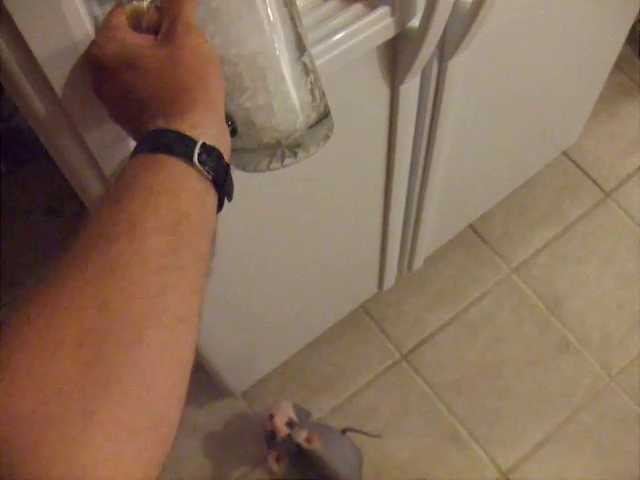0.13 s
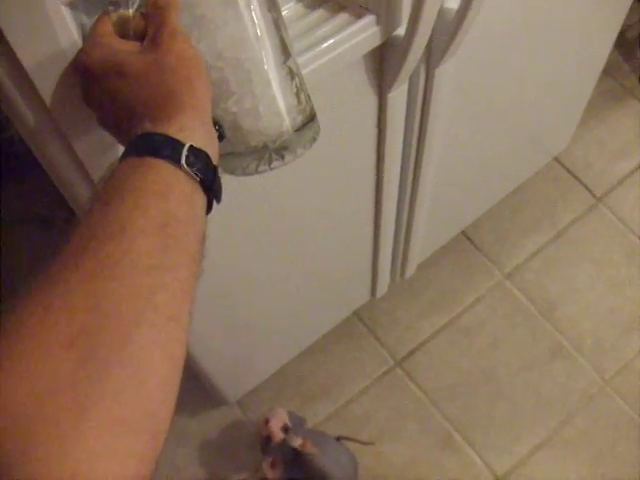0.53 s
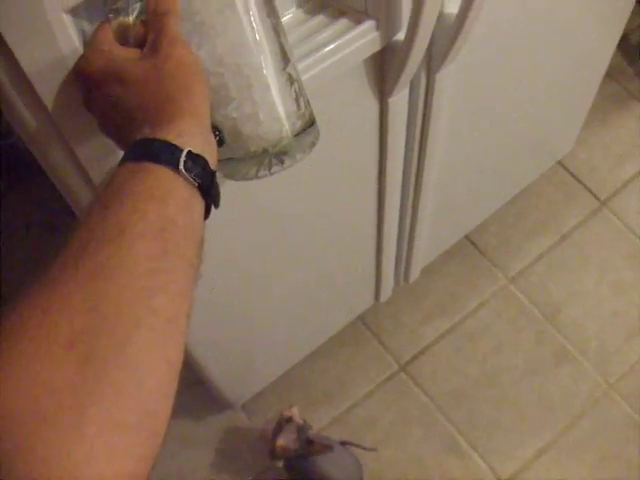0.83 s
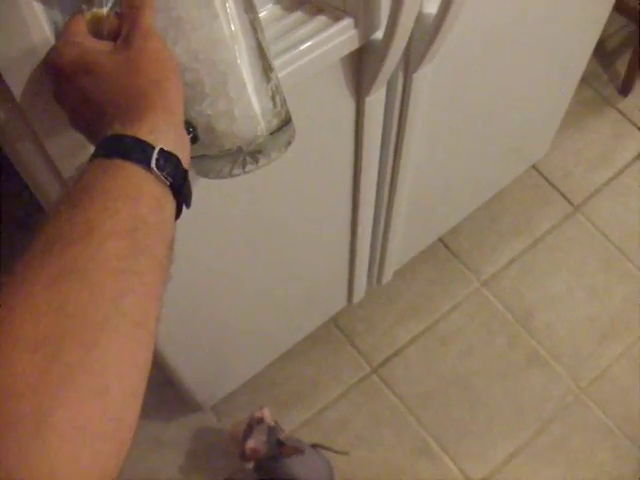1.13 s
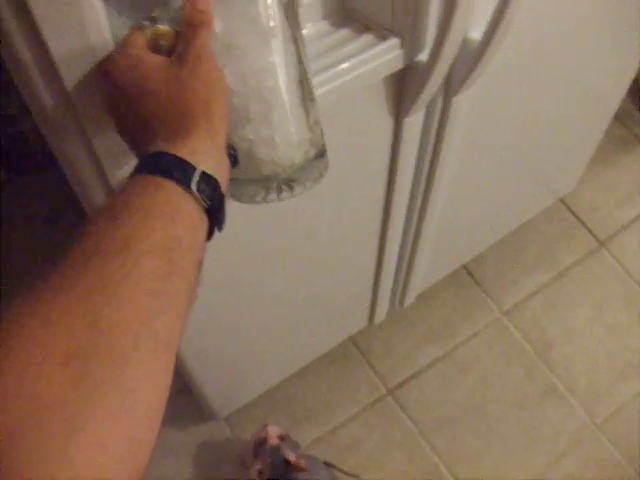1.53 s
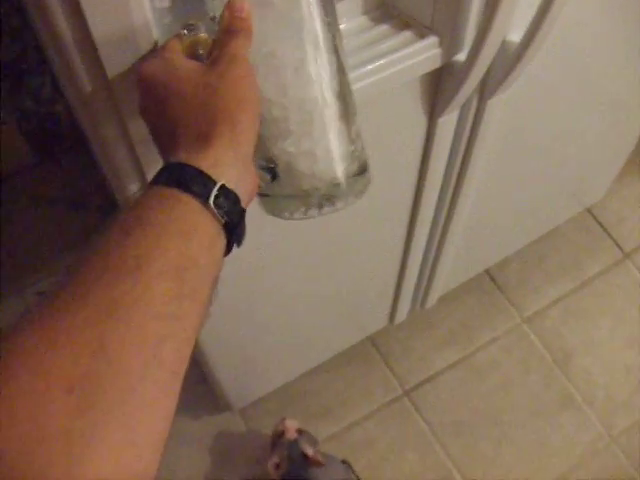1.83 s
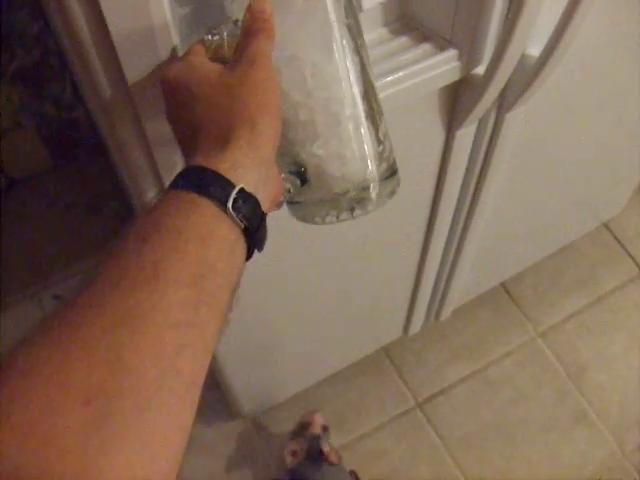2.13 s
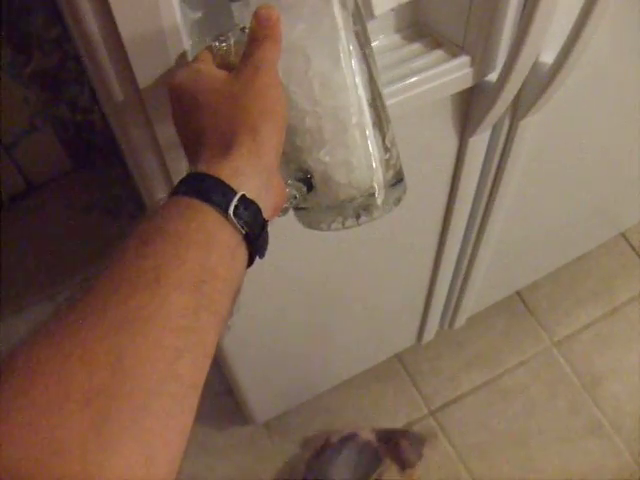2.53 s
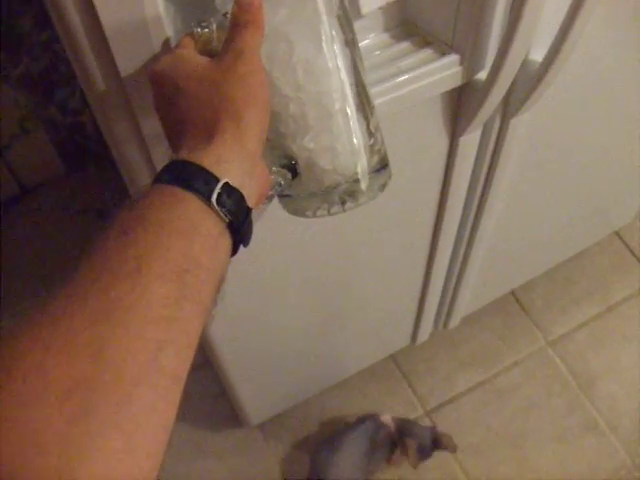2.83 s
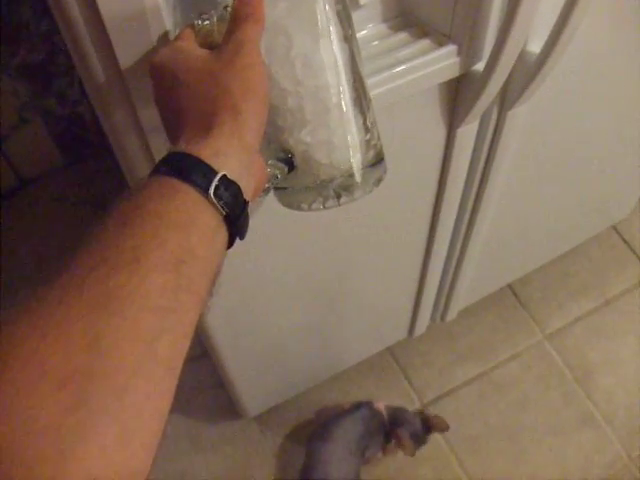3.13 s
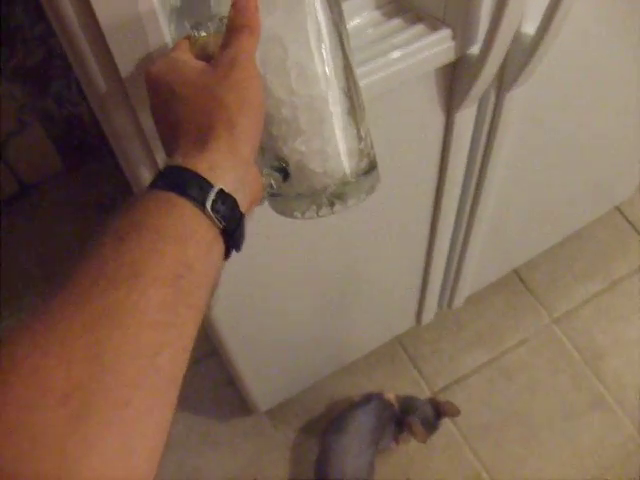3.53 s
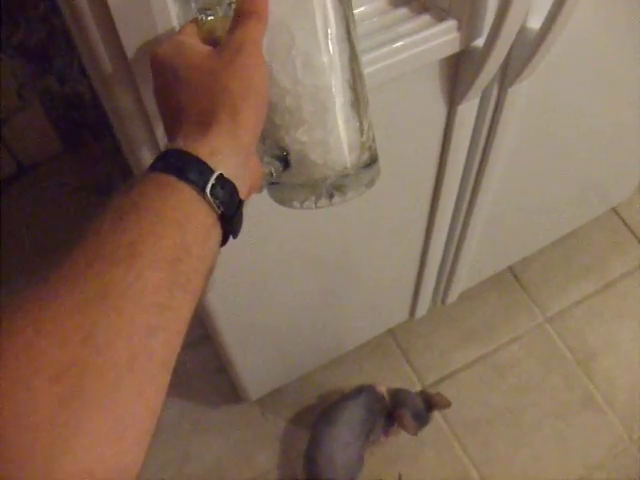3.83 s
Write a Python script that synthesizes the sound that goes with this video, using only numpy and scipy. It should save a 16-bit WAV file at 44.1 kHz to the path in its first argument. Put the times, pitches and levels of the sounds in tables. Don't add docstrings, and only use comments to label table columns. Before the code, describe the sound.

A fridge door ice crusher runs from the start, its geared motor whining unsteadily and rattling in plastic. Blades crunch hardest around 0.2-0.6 s, with more sharp cracks near 1.45-2.0 s, while chips clatter and ring into a glass mug. It stops about 2.1 s with a last clatter. Quiet room hum, ice ticks near 2.4-2.6 s, a faint flap creak 3.1-3.7 s, and final ice clicks from 3.8 s. Grainy small-camera sound.

```python
import sys
import numpy as np
from scipy import signal
from scipy.fft import rfft, irfft, next_fast_len
from scipy.io import wavfile
from scipy.ndimage import uniform_filter1d, map_coordinates

SR = 44100
rng = np.random.default_rng(int(sys.argv[2]) if len(sys.argv) > 2 else 0)


def file_out(sig):
    cols = np.atleast_2d(sig).T
    lim = np.clip(cols, -1, 1)
    pcm = np.round(lim * 32767).astype(np.int16)
    wavfile.write(sys.argv[1], SR, pcm)


def linear_from_db(decibels):
    return 10 ** (np.asarray(decibels, float) / 20)


N = 176400


def unit(x):
    return x / np.sqrt(np.mean(x ** 2) + 1e-20)


def along(points, hz):
    f, v = np.transpose(points)
    return np.interp(np.log(hz + 1), np.log(f + 1), v)


def curves(rows):
    s, *cols = np.transpose(rows)
    return [np.interp(np.arange(N) / SR, s, c) for c in cols]


def wobble(knots_per_s):
    knots = rng.standard_normal(int(N * 200 / SR) + 4)
    return map_coordinates(knots, [np.arange(N) * knots_per_s / SR])


def filtered(x, response):
    m = next_fast_len(N + SR // 2)
    return irfft(rfft(x, m) * response(np.fft.rfftfreq(m, 1 / SR)), m)[:N]


def colour(points):
    return lambda hz: linear_from_db(along(points, hz))


def body(peaks):
    def response(f):
        total = 0
        for k, (c, w, db) in enumerate(peaks):
            total = total + (-1) ** k * linear_from_db(db) * 1j * f * w / (c * c - f * f + 1j * f * w + 1e-9)
        return total
    return response


def crackle(per_s, spread_db):
    chance, side, size = rng.random((3, N))
    return unit((chance < per_s / SR) * np.sign(side - .5) * linear_from_db(-spread_db * np.log(size + .03)))


def ring(modes, scatter_db):
    t = np.arange(SR // 5) / SR
    total = 0
    for hz, db, t60_s in modes:
        level = linear_from_db(db + scatter_db * rng.standard_normal() - 60 * t / t60_s)
        total = total + level * np.sin(2 * np.pi * hz * t)
    return total * (1 - np.exp(-t / 0.00015))


def burst(t60_s):
    t = np.arange(SR // 5) / SR
    return linear_from_db(-60 * t / t60_s) * (1 - np.exp(-t / 0.00075)) * rng.standard_normal(len(t))


def add(track, s, x):
    part = track[round(s * SR):][:len(x)]
    part += x[:len(part)]


# time in seconds, tooth rate in Hz, whine in dB, running rattle in dB.
MOTOR_RUN = [(0, 1253, -24, -25.5), (.31, 1242, -24, -34.5), (.4, 1160, -33, -40), (.66, 1220, -39, -27.5),
             (.75, 1267, -30.5, -30), (.95, 1250, -24.5, -28), (1.05, 1273, -31, -28),
             (1.16, 1258, -22.5, -30), (1.28, 1307, -34.5, -25.5), (1.42, 1293, -23.5, -29.5),
             (1.5, 1218, -23, -24), (1.62, 1194, -33.5, -28), (1.72, 1265, -32, -25.5),
             (1.8, 1276, -29, -28), (1.85, 1135, -32, -32.5), (2.02, 1229, -39, -28),
             (2.05, 1222, -41, -51), (2.15, 1199, -90, -79.5)]
# multiple of the tooth rate, level in dB.
GEAR_MESHES = [(.25, -11), (.62, -13), (.745, -12), (2, -15), (2.27, -17)]
# centre in Hz, width in Hz, level in dB.
HOUSING_MODES = [(162, 80, -15.5), (231.5, 28, -7), (318, 75, -8.5), (592.7, 20, -10), (787.5, 29, -8),
                 (918.4, 40, -3.5), (1081, 170, -8), (1331, 97, -3.5), (2533, 44, -14.5), (2760, 100, -24),
                 (3500, 230, -25.5)]
# frequency in Hz, density in dB per Hz.
WHIRR_SPECTRUM = [(24, -49), (40, -34), (238, -10.5), (513, -13), (1270, -7.5), (1550, -5.5), (4200, -30.5),
                  (6440, -32.5), (8840, -68.5), (11500, -106), (19400, -120)]


def motor():
    jitter_hz, flutter_db, whirr_db = 3, 1.2, -4
    tooth_hz, whine_db, run_db = curves(MOTOR_RUN)
    phase = 2 * np.pi * np.cumsum(tooth_hz + jitter_hz * wobble(60)) / SR
    whine = unit(np.sin(phase) * linear_from_db(flutter_db * wobble(70)))
    meshes = sum(linear_from_db(db + 3.6 * wobble(25)) * np.sin(k * phase) for k, db in GEAR_MESHES)
    rattle = unit(filtered(crackle(2500, 2.9), body(HOUSING_MODES)))
    whirr = unit(filtered(rng.standard_normal(N), colour(WHIRR_SPECTRUM)))
    unsteady = linear_from_db(1.5 * wobble(20))
    tones = linear_from_db(whine_db) * (whine + meshes)
    return tones, linear_from_db(run_db) * unsteady * (rattle + linear_from_db(whirr_db) * whirr)


# time in seconds, effort in dB.
BLADE_EFFORT = [(0, -45.5), (.19, -19), (.21, -29), (.3, -23.5), (.36, -20.5), (.47, -20), (.49, -23.5),
                (.51, -20.5), (.61, -22), (.64, -34.5), (.72, -36.5), (1.15, -30.5), (1.4, -44),
                (1.45, -22.5), (1.5, -30), (1.57, -26), (1.7, -30), (2.03, -37)]
# frequency in Hz, density in dB per Hz.
CRUNCH_SPECTRUM = [(35, -34), (60, -24.5), (270, -2), (538, -9), (597, -4), (1290, -3.5), (3050, -19.5),
                   (5820, -33), (8840, -36), (11500, -96.5), (19400, -120)]
# centre in Hz, width in Hz, level in dB.
CABINET_MODES = [(115.2, 29, -4), (175.4, 77, -2.5), (273.2, 67, -1), (353.3, 50, 0.5)]
# centre in Hz, width in Hz, level in dB.
BLADE_MODES = [(5900, 220, 4)]
# time in seconds, peak in dB, pitch in Hz.
CUBE_BREAKS = [(.2015, 0.5, 990), (0.2027, -4.5, 290), (.325, -3, 926), (.356, -5.5, 886), (.393, -14, 276),
               (.424, -10.5, 1187), (.451, -10, 338), (.464, -8, 312), (.499, -4, 1270), (.516, -8.5, 600),
               (.545, -14, 246), (.586, -13, 750), (.602, -12, 394), (.667, -5, 900), (.675, -9, 300),
               (.869, -16, 325), (1.15, -14.5, 308), (1.435, -17, 1700), (1.446, -3, 924),
               (1.471, -6.5, 987), (1.528, -13.5, 936), (1.566, -6, 905), (1.583, -18, 253),
               (1.645, -13, 1920), (1.737, -7.5, 987), (1.893, -12.5, 910), (1.912, -6.5, 1060),
               (1.985, -14.5, 1246)]


def blades():
    cracks_per_s, spread_db, crack_t60_s = 900, 1.4, .02
    groan_db, groan_db_per_effort_db, break_cycles = -7.5, 1.5, 7
    effort_db, = curves(BLADE_EFFORT + [(BLADE_EFFORT[-1][0] + 0.063, -90)])
    dying = linear_from_db(-60 * np.arange(SR // 20) / SR / crack_t60_s)
    grains = unit(signal.fftconvolve(abs(crackle(cracks_per_s, spread_db)), dying)[:N])
    cracks = linear_from_db(effort_db) * grains * rng.standard_normal(N)
    groan = unit(filtered(rng.standard_normal(N), lambda f: body(CABINET_MODES)(f) ** 2))
    load_db = groan_db_per_effort_db * (effort_db + 24.5)
    x = linear_from_db(groan_db - 25 + load_db + 1.8 * wobble(27)) * groan
    for s, db, hz in CUBE_BREAKS:
        add(x, s, linear_from_db(db) * ring([(hz, -2, break_cycles / hz), (1900, -10, .008)], 0))
        add(cracks, s - .001, linear_from_db(db - 9.5) * burst(0.04))

    def crunch(f):
        resonance = 1 + 0.55 * abs(body(HOUSING_MODES)(f)) + abs(body(BLADE_MODES)(f))
        return linear_from_db(13.5 + along(CRUNCH_SPECTRUM, f)) * resonance
    return x + filtered(cracks, crunch)


# time in seconds, peak in dB, ring of the glass in dB.
CHIP_HITS = [(0.0879, -30, 7), (0.1097, -20.5, 14.5), (0.1179, -19.5, 8.5), (0.1406, -17.5, 12),
             (0.18, -18.5, -12.5), (0.198, -23.5, -4), (0.28, -19.5, 7.5), (0.3065, -22.5, 5),
             (0.5, -23, -7.5), (0.537, -34, -5), (0.6662, -21, 5), (0.822, -13, 2), (0.8933, -21, -12),
             (0.9163, -29, -15.5), (1.0219, -28, 6), (1.1623, -23.5, -19), (1.286, -31.5, 9),
             (1.3782, -28, -12.5), (1.4325, -25.5, -2), (1.531, -28, 1.5), (1.6774, -22.5, -19.5),
             (1.779, -25.5, -7.5), (1.8982, -16.5, -2.5), (1.9663, -25.5, 0.5), (1.9855, -32, 13.5),
             (2.069, -31, 3), (2.0794, -23, -2), (2.0836, -11, -7.5), (2.1087, -22, 4.5),
             (2.1197, -20.5, 4), (2.1861, -31.5, 3), (2.282, -33, -9.5)]
# frequency in Hz, density in dB per Hz.
CHIP_SPECTRUM = [(300, -14), (2500, -4), (3600, -11), (4800, -13), (5800, -7), (7300, -7), (9500, -8)]
# frequency in Hz, level in dB, t60 in seconds.
CAVITY_MODES = [(401, -15, .12), (820, -11, .048), (1462, -9, .032)]
# frequency in Hz, level in dB, t60 in seconds.
GLASS_MODES = [(3850, -16, .015), (5750, -2, .022), (6050, -7, .02), (6900, -4, .02), (7450, -5, .02)]
# frequency in Hz, level in dB, t60 in seconds.
BELL_MODES = [(2610, 0, .03), (2850, -8, .02)]


def mug():
    clatter_t60_s, glass_db = .02, -8.5
    crumbs_per_s, crumb_db, crumb_t60_s = 120, -31, 0.2
    clatter, air_ring, glass_ring, heap = np.zeros((4, N))
    t = np.arange(SR // 2) / SR
    for s, db, ring_db in CHIP_HITS:
        add(clatter, s, linear_from_db(db + 8) * burst(clatter_t60_s))
        add(air_ring, s, linear_from_db(db - 3.5) * ring(CAVITY_MODES, 1.4))
        add(glass_ring, s, linear_from_db(db + glass_db) * ring(GLASS_MODES, 4.8))
        add(glass_ring, s, linear_from_db(db + ring_db - 6.0) * ring(BELL_MODES, 1.0))
        add(heap, s, linear_from_db(db - 60 * t / crumb_t60_s))
    damped_glass = body([(hz, 1500, db) for hz, db, _ in GLASS_MODES])
    crumbs = unit(filtered(crackle(crumbs_per_s, 3.1), damped_glass))
    crumbs = linear_from_db(crumb_db + 10.5) * heap * crumbs
    return filtered(clatter, colour(CHIP_SPECTRUM)) + air_ring + crumbs, glass_ring


# time in seconds, peak in dB, pitch in Hz.
RIM_SPLINTERS = [(0.344, -21, 5570), (0.516, -24.5, 5040), (.573, -24.5, 6980), (0.7216, -28.5, 5930),
                 (0.7462, -28, 6100), (0.8015, -29, 5930), (1.0634, -34, 5640), (1.2264, -33, 5180),
                 (1.283, -30.5, 6240), (1.3588, -33.5, 7500), (1.3818, -26, 7340), (1.5689, -32.5, 5750),
                 (1.6487, -30, 6250), (1.6742, -31, 6890), (1.6982, -30, 6760), (1.7382, -29.5, 5110),
                 (1.7917, -27.5, 6850), (1.852, -33, 6420), (1.914, -25.5, 6760), (1.9415, -20.5, 4310),
                 (2.0595, -28.5, 6360), (2.083, -16, 5770), (2.171, -34.5, 6920), (2.292, -41.5, 6810)]


def splinters():
    x = np.zeros(N)
    t = np.arange(SR // 5) / SR
    for s, db, hz in RIM_SPLINTERS:
        puff = uniform_filter1d(burst(0.017), size=12) * 4
        add(x, s, linear_from_db(db) * puff * np.sin(2 * np.pi * hz * t))
    return x


# time in seconds, peak in dB, chute boom in dB.
FLAP_SLIPS = [(3.133, -37, -62), (3.244, -39, -52), (3.296, -40.5, -45), (3.338, -39.5, -50),
              (3.401, -38.5, -43.5), (3.46, -40.5, -47.5), (3.499, -37.5, -44), (3.559, -39.5, -42.5),
              (3.597, -40.5, -45), (3.625, -37.5, -48.5), (3.649, -46, -47.5), (3.728, -45.5, -47)]
# centre in Hz, width in Hz, level in dB.
FLAP_MODES = [(796, 50, 1), (920, 60, 0), (1120, 70, 3), (1490, 300, -7), (2590, 300, -7),
              (4300, 3500, -18)]
# frequency in Hz, level in dB, t60 in seconds.
CHUTE_MODES = [(374, 1.5, 0.096)]


def flap():
    flap_db, slip_t60_s, boom_delay_s = 9, .085, 0.0021
    slips, booms = np.zeros((2, N))
    for s, db, boom_db in FLAP_SLIPS:
        add(slips, s, linear_from_db(db + flap_db) * np.append(11, burst(slip_t60_s)))
        add(booms, s + boom_delay_s, linear_from_db(boom_db) * ring(CHUTE_MODES, 0))
    return booms + filtered(slips, body(FLAP_MODES))


# time in seconds, peak in dB, low tone in Hz, high tone in Hz.
ICE_TICKS = [(2.405, -36, 5140, 6630), (2.435, -35, 4020, 7200), (2.628, -29, 770, 1473),
             (2.63, -33.5, 394, 6850), (2.63, -35, 2690, 3560), (3.738, -37, 2850, 4880),
             (3.811, -27, 3150, 4400), (3.813, -32.5, 1190, 1570), (3.815, -34, 2640, 6600),
             (3.966, -41, 3340, 3500), (3.987, -29, 1170, 3500)]


def ticks():
    t60_s = .011
    x = np.zeros(N)
    for s, db, low_hz, high_hz in ICE_TICKS:
        tones = ring([(low_hz, 0, t60_s), (high_hz, -1, t60_s)], 0)
        add(x, s, linear_from_db(db - 4.5) * (tones + linear_from_db(2.5) * burst(1.6 * t60_s)))
    return x


# frequency in Hz, t60 in seconds.
KITCHEN_DECAY = [(150, 0.68), (1000, 0.61), (5000, 0.75), (9000, 0.7)]


def kitchen(x):
    hz, t, z = signal.stft(rng.standard_normal(SR * 3 // 4), SR, nperseg=256)
    decay = linear_from_db(-60 * t / along(KITCHEN_DECAY, hz)[:, None])
    tail = signal.istft(z * decay, SR, nperseg=256)[1]
    delayed = np.pad(x, (300, 0))
    return signal.fftconvolve(delayed, tail / np.linalg.norm(tail))[:N]


# frequency in Hz, density in dB per Hz.
AIR_SPECTRUM = [(25, -4.5), (60, 0), (100, -11.5), (140, 2), (220, -1), (320, -3.5), (600, -9.5),
                (9000, -26.5)]
# time in seconds, level in dB.
DRONE_LEVEL = [
    (2.44, -78.5),
    (2.52, -50),
    (2.63, -58),
    (2.75, -52),
    (2.85, -63),
    (3.5, -67.5),
    (3.6, -57.5),
    (3.85, -61),
    (4, -60),
]


def air():
    air_db, drone_hz = -52.5, 162.3
    drone_db, = curves(DRONE_LEVEL)
    cycles = drone_hz * np.arange(N) / SR + 0.15 * wobble(3.2)
    drone = linear_from_db(drone_db) * np.sin(2 * np.pi * cycles)
    level = linear_from_db(air_db + 1.4 * wobble(6))
    return level * unit(filtered(rng.standard_normal(N), colour(AIR_SPECTRUM))) + drone


def scene():
    chips, rings = mug()
    tones, rattle = motor()
    direct = rings + ticks() + splinters() + tones
    machine = filtered(rattle + blades(), lambda f: (1j * f / (70 + 1j * f)) ** 2)
    near = machine + chips + flap()
    room = linear_from_db(-4) * kitchen(near + linear_from_db(-8) * direct)
    return (near + direct + room + air())[None]


def band_limit(x):
    return signal.sosfilt(signal.butter(12, 8990, fs=SR, output="sos"), x)


# time in seconds, gain in dB.
DUCK_GAIN = [
    (.206, -0.5),
    (.209, -5),
    (.33, 0),
]
# frequency in Hz, gain in dB.
SMOOTHING = [(7000, 0), (7900, -2.5), (8600, -15), (9200, -36), (9600, -90)]


def record(dry):
    step = .71 / 128
    gain_db, = curves(DUCK_GAIN)
    half_rate = signal.resample_poly(dry[0] * linear_from_db(gain_db), 1, 2)
    steps = np.clip(np.floor(half_rate / step), -128, 127)
    stuffed = np.zeros(N)
    stuffed[::2] = 2 * step * steps
    return band_limit(filtered(stuffed, colour(SMOOTHING))[None])


dry = scene()
out = record(dry)
file_out(out)
```